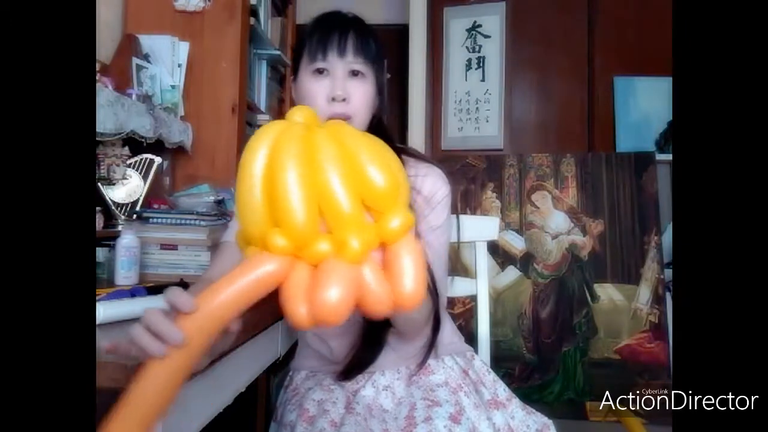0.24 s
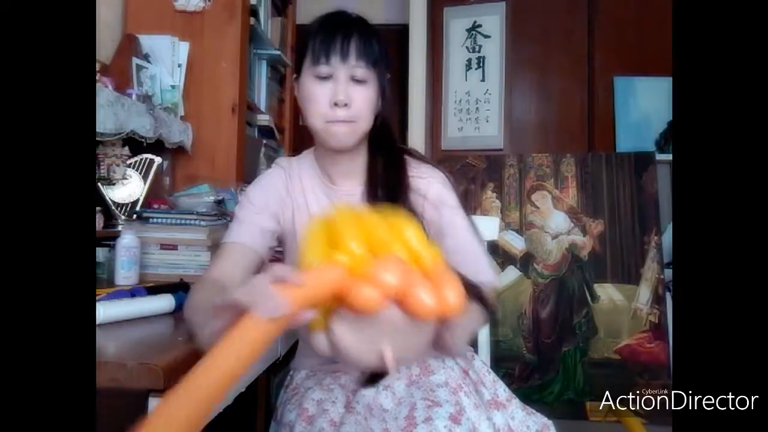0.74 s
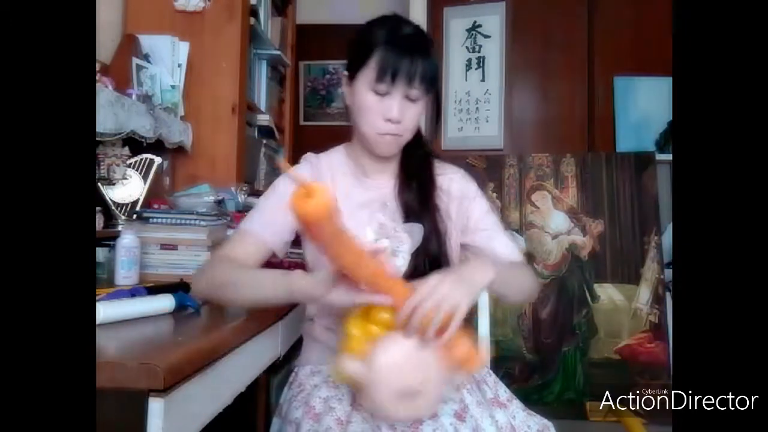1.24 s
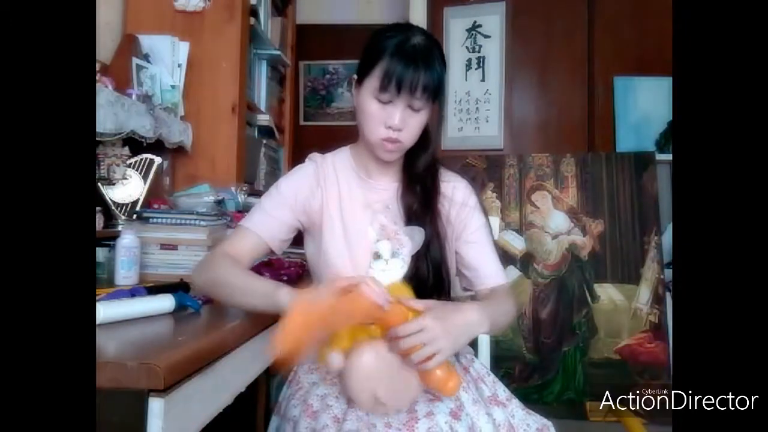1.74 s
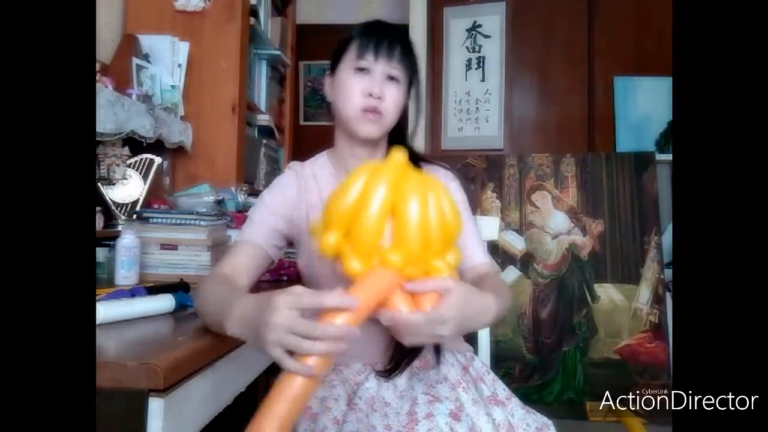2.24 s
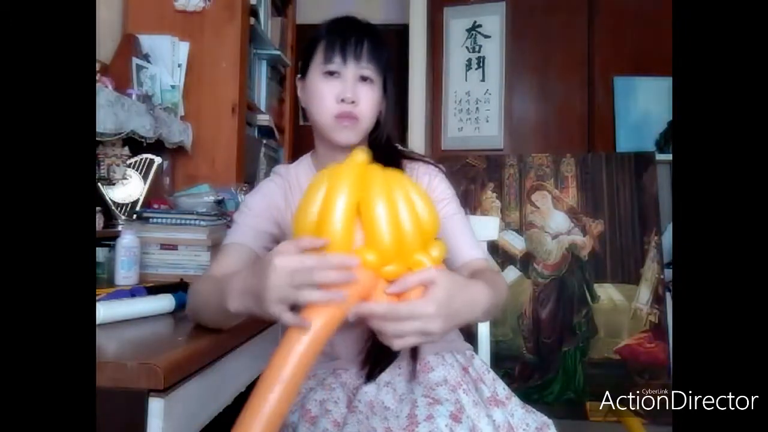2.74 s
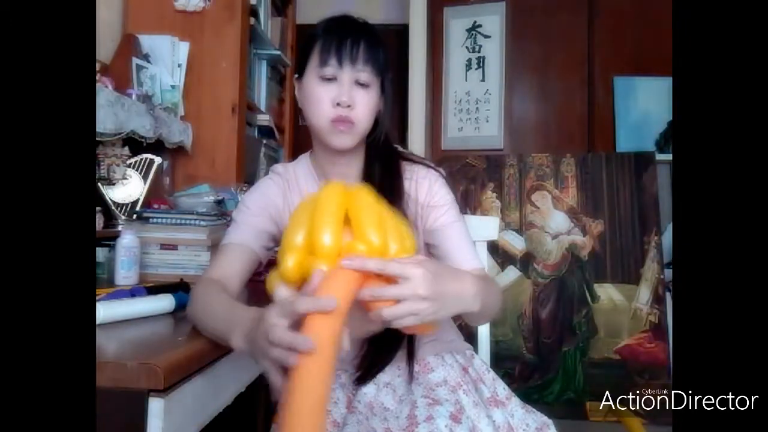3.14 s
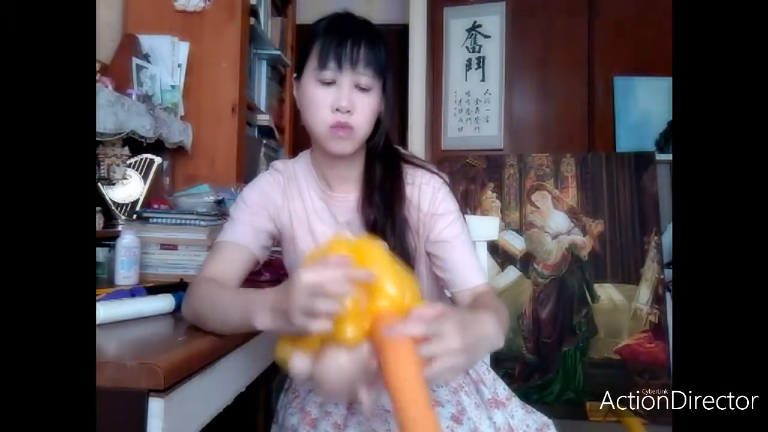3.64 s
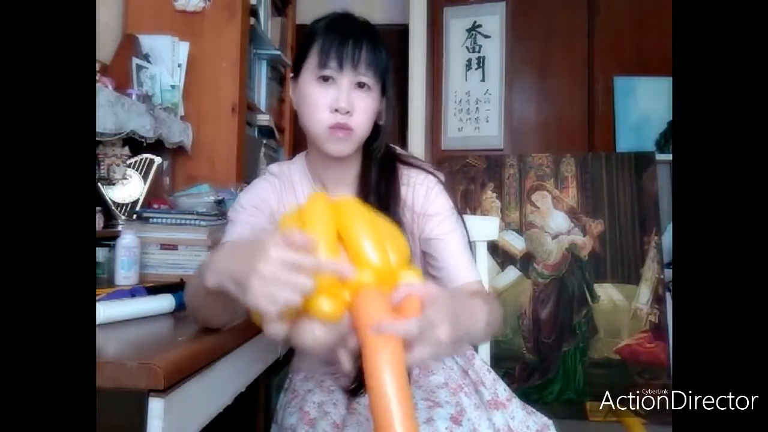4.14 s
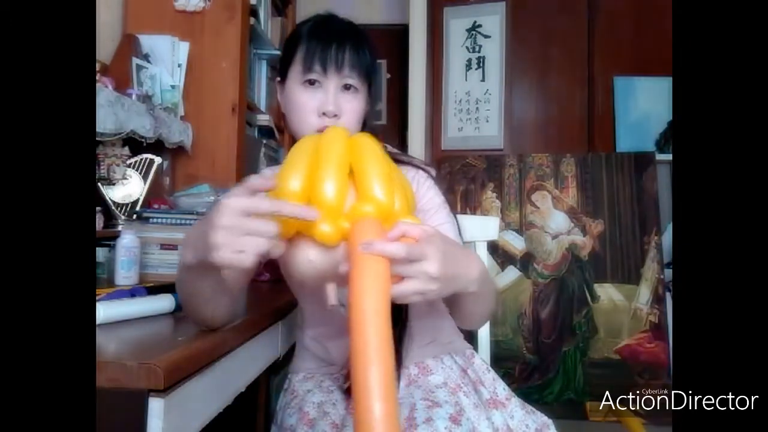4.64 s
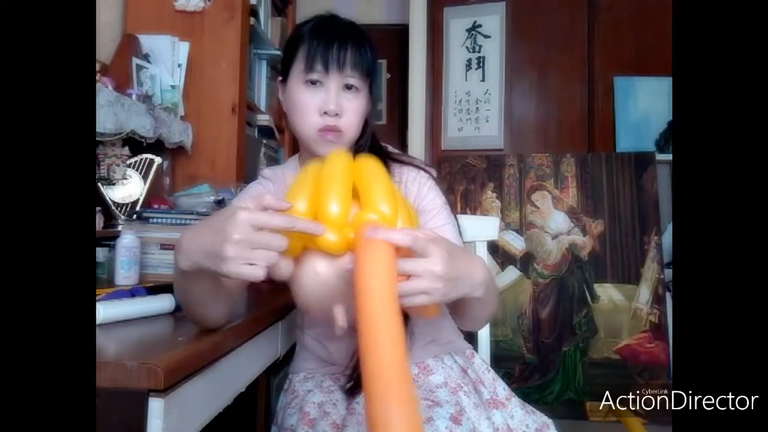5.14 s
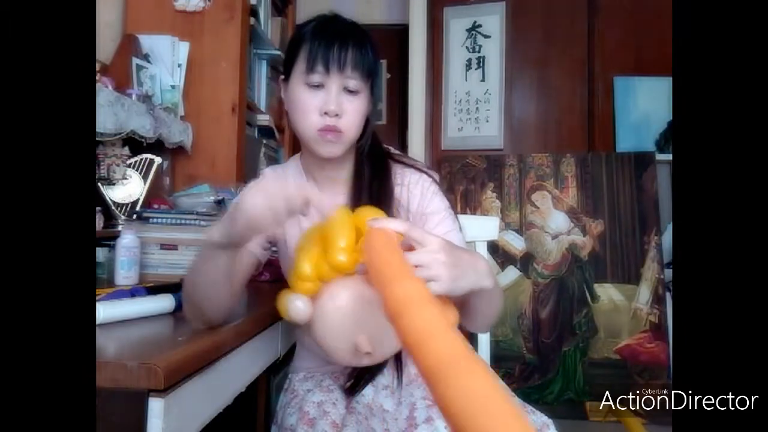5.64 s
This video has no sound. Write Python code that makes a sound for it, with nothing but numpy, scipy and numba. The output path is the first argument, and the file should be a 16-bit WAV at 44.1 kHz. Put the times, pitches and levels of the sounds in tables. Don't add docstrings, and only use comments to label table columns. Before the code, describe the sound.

Hands twist inflated balloons together at a desk. Faint rubbing and soft lap bumps come first, with isolated rubbery snaps, then short creaks and squeaks. Around four seconds loud snaps and a rapid stuttering creak burst out, followed by paired hollow clacks and a final sharp slap. A small room adds a short tail; a low fan hums. The tablet microphone, about an arm's length away, sounds thin and treble-peaked.

```python
import sys
import numpy as np
from scipy import signal
from scipy.fft import rfft, irfft
from scipy.io import wavfile
from scipy.ndimage import uniform_filter1d
from numba import njit

SR = 44100
rng = np.random.default_rng(int(sys.argv[2]) if len(sys.argv) > 2 else 0)


def int16_out(signal):
    q = np.round(np.clip(np.atleast_2d(signal).T, -1, 1) * 32767)
    wavfile.write(sys.argv[1], SR, q.astype(np.int16))


def boost(x):
    u = np.asarray(x, float) / 20
    return 10 ** u


N = 260190

# (time [s], peak [dB], tube ring [Hz], ring level [dB])
SNAPS = [(.6247, -39.5, 3920, -1), (.7741, -34, 1400, -14), (1.6631, -28, 650, -12),
         (2.251, -36, 1370, -18), (2.448, -44.5, 684, -16), (2.5226, -39, 810, -21),
         (2.635, -40.5, 2150, -12), (2.8905, -36.5, 1710, -22), (2.9678, -44.5, 550, -13),
         (3.9767, -24.5, 634, -20), (4.0063, -20, 6600, -7), (4.1245, -24, 2000, -13),
         (4.298, -26.5, 907, -6), (4.3008, -26, 1980, -8), (4.3364, -52, 860, -2.5),
         (4.5625, -30.5, 2560, -17)]
TICKS = [(.7944, -52, 3800, 1), (.8744, -54, 961, -12), (1.323, -55, 880, 4), (1.4014, -50, 720, -19.5),
         (1.4435, -40.5, 2560, 1), (1.7389, -40.5, 560, -8), (1.7964, -43.5, 800, -5),
         (1.8578, -43, 4020, -6), (1.8795, -41, 3810, -9), (1.886, -38, 3540, -4), (1.945, -48, 3460, -13),
         (2.1061, -51.5, 1980, 3), (2.1415, -47, 493, 1), (2.4176, -57, 861, -20), (2.4766, -49.5, 780, 0),
         (2.5571, -46, 1260, 4.5), (2.5646, -43.5, 1740, -1), (3.1117, -48, 657, -22),
         (3.2315, -45, 2800, 0.5), (4.1145, -26, 4600, 7), (4.1143, -28, 6600, 2), (4.1225, -38, 6800, 3),
         (4.55, -37.5, 668, 1.5), (4.9666, -58, 640, 9), (5.3224, -41, 5600, 12.5), (3.672, -62, 6500, -13),
         (5.4825, -61, 6500, -12), (2.822, -48, 11500, 25.5), (3.865, -64, 12000, 22),
         (3.8975, -66, 14000, 28), (4.0982, -64, 13000, 20), (4.306, -65, 14000, 25),
         (4.3135, -58, 13000, 24), (4.3392, -60, 10000, 26), (3.9768, -51, 11900, 25),
         (3.2, -74, 12000, 22), (2.2025, -60, 12000, 31)]
POPS = [(1.4519, -38.5, 5070, 5.5), (2.2019, -27, 1040, -12), (3.066, -41, 662, -25),
        (3.3553, -32.5, 1384, -0.5), (3.7327, -47.5, 2150, 7.5), (3.8452, -30.5, 2300, -10),
        (3.925, -37.5, 2500, -7), (4.0114, -24.5, 580, -2.5), (4.4777, -30.5, 2100, -28.5),
        (4.6259, -41.5, 1020, -13), (4.698, -31, 2700, -6.5), (4.754, -28, 1340, -8),
        (5.253, -36, 1450, -11), (5.868, -41.5, 920, -7), (3.593, -29.5, 732, -0.5),
        (3.8465, -35, 675, -2.5), (4.4175, -34.5, 1160, 1.5), (5.323, -40.5, 1030, 7.5),
        (1.666, -32.5, 656, -7)]
SLAPS = [
    (5.5479, -14, 3080, -11),
    (5.549, -18.5, 6340, 3.5),
    (5.5497, -27, 870, 3.5),
    (5.5555, -30, 1460, 0),
    (5.553, -32, 1150, -12),
    (5.5604, -25.5, 1460, 1),
    (5.5655, -31.5, 1400, 3),
    (5.5715, -36, 1350, 2),
    (5.575, -40, 6400, 1),
]
CLACKS = [(4.1393, -19, 1300, -10), (4.1833, -18.5, 1200, -10.5), (4.6873, -21.5, 1140, -3),
          (4.6944, -20.5, 1200, -10), (4.7412, -19.5, 1150, -7.5), (4.7509, -21, 1240, -9),
          (5.2295, -29.5, 1100, -4.5), (5.2353, -29, 1200, -11), (5.2417, -29, 1000, -6),
          (5.2445, -29, 1100, -14), (5.248, -23, 1246, -7.5), (5.2688, -33, 1150, -4),
          (5.2827, -32.5, 1000, -4), (5.292, -43, 800, -2), (5.301, -41, 800, 1), (.6252, -35, 1710, -9),
          (4.0068, -18, 2800, -20), (4.3128, -28, 1250, -6), (3.59, -29, 1400, -9)]

# (start [s], length [s], level [dB], tube ring [Hz], treble [dB])
CREAKS = [(.634, 0.0093, -49, 4000, -3), (.645, 0.052, -65, 4040, -4), (.755, 0.12, -68, 6800, 7.5),
          (.774, 0.011, -62, 3700, -4), (.925, 0.028, -68, 4500, 2), (1.025, .04, -81, 4500, 6),
          (1.664, 0.029, -47.5, 1500, -0.5), (1.675, 0.057, -46.5, 634, -11), (2.015, 0.032, -70, 4830, 9),
          (2.1, 0.077, -56, 2040, -9), (2.686, 0.027, -54.5, 6800, 8), (2.734, 0.027, -49, 3770, 1),
          (2.812, 0.011, -48, 1390, -10), (2.82, 0.018, -42.5, 1350, -8), (2.822, 0.061, -74, 11500, 11),
          (2.856, 0.025, -64, 6700, 3), (2.89, 0.029, -58, 4000, 2), (2.936, 0.019, -64, 6700, 3.5),
          (3.0, 0.021, -67.5, 6600, 7), (3.056, 0.017, -64, 5000, -1), (3.232, 0.017, -55.5, 6600, 7),
          (4.088, 0.06, -53.5, 6500, 0), (4.1122, 0.0048, -46, 6600, 0), (4.1142, 0.018, -35, 4400, -2),
          (4.184, 0.098, -55, 11000, 16), (4.12, 0.042, -60, 11000, 11), (4.648, 0.032, -54.5, 6700, 12.5),
          (3.458, 0.026, -35.5, 760, -27), (3.135, 0.0456, -53, 4280, -6), (3.065, 0.027, -53, 1720, -20),
          (3.3565, 0.057, -36, 2310, -12.5), (3.41, 0.0426, -41.5, 3170, -31.5),
          (3.448, 0.043, -38.5, 1570, -24), (3.574, 0.014, -48, 3930, -25), (3.61, 0.027, -41, 2320, -26),
          (3.841, 0.0077, -47.5, 2120, -7), (4.643, 0.017, -33, 1020, -18),
          (5.5315, 0.011, -42, 2000, -5.5), (5.5455, 0.004, -44, 6260, 7), (5.548, 0.011, -45, 1400, 7),
          (5.858, 0.047, -55, 1040, -33)]
# (start [s], length [s], level [dB], tube ring [Hz], treble [dB])
GROANS = [
    (1.7, 0.11, -58, 620, -28),
    (3.27, 0.088, -48.5, 1730, -26),
    (3.5, 0.028, -41, 1630, -29),
    (3.9412, 0.0078, -33.5, 1010, -11),
    (4.145, 0.047, -39, 1560, -13),
    (4.32, 0.034, -34, 873, -41),
    (5.25, 0.051, -52, 745, -27),
]
# (start [s], length [s], slip rate [1/s], level [dB], tube ring [Hz])
SQUEAKS = [
    (3.29, 0.021, 1100, -53, 2320),
    (3.1, 0.014, 950, -65, 2330),
    (3.379, 0.035, 480, -32.5, 1880),
    (3.5925, 0.014, 310, -35.5, 1530),
    (4.414, 0.0082, 506, -32.5, 1120),
    (4.444, 0.0234, 400, -36.5, 2600),
    (4.3, 0.021, 655, -33.5, 3300),
    (3.134, 0.0295, 1900, -60, 4320),
    (2.905, 0.019, 2300, -68, 3600),
    (3.734, 0.016, 990, -67, 2280),
]
# (start [s], length [s], slip rate [1/s], level [dB], tube ring [Hz], treble [dB])
JUDDER = [
    (4.1896, .077, 142.8, 0, 890, -2),
]
# (start [s], length [s], slip rate [1/s], level [dB], tube ring [Hz], treble [dB])
RASPS = [
    (4.185, .09, 370, -38, 580, -25),
    (4.2, .075, 490, -39.5, 420, -25),
    (4.196, 0.0587, 400, -33.5, 1600, -25),
    (1.668, 0.049, 480, -59, 870, -25),
    (1.72, 0.071, 400, -55.5, 680, -25),
    (4.008, 0.0213, 550, -37.5, 630, -18),
]
NEIGHBOURS = (.82, 1, 1.2)
# (frequency [Hz], width [Hz], level [dB])
BUNCH = [(414, 65, 3), (560, 395, 17.5)]
# (time [s], level [dB], drum pitch [Hz])
THUMPS = [(1.664, -53, 634), (1.7, -52.5, 589), (1.745, -50.5, 643), (2.821, -40.5, 366),
          (2.979, -52.5, 373), (3.362, -46.5, 335), (3.46, -41.5, 316), (3.593, -41, 388),
          (4.009, -41, 314), (4.226, -40, 416), (4.452, -44.5, 354), (4.658, -41, 660), (4.75, -40, 235),
          (5.249, -51.5, 390)]
# (middle [s], length [s], rub level [dB], hiss level [dB])
SLIDES = [(0., 0.16, -88, -75.5), (0.825, 0.12, -78.5, -75), (1.05, 0.047, -109, -75.5),
          (1.356, 0.177, -89, -74), (1.494, .12, -66, -55), (1.697, 0.067, -73, -67),
          (1.872, 0.18, -80, -58), (2.02, 0.21, -81, -69), (2.229, 0.083, -74, -63.5),
          (2.322, 0.066, -88, -66.5), (2.515, 0.31, -80.5, -75), (2.716, 0.12, -70.5, -71),
          (2.93, 0.18, -97, -75), (3.164, 0.17, -78, -62.5), (3.28, 0.034, -62, -64),
          (3.399, 0.12, -52, -78), (3.78, 0.2, -77.5, -88), (3.856, 0.076, -79, -62.5),
          (4.003, 0.046, -59, -47), (4.24, 0.17, -50.5, -54), (4.438, 0.085, -72, -56),
          (4.563, 0.021, -58, -76), (4.7, 0.28, -73.5, -81), (5.287, 0.073, -86, -88),
          (5.46, 0.18, -88.5, -81), (5.69, 0.088, -76, -75)]
# (middle [s], length [s], level [dB])
BUMPS = [(.25, 0.21, -60), (1.33, 0.21, -51), (.87, 0.076, -59), (1.0, 0.2, -57.5), (1.2, 0.085, -54),
         (1.51, 0.038, -55), (1.58, 0.017, -48.5), (1.71, 0.11, -58.5), (1.81, 0.045, -58),
         (1.89, 0.031, -60.5), (2.02, 0.18, -66), (2.21, 0.12, -62), (2.31, 0.052, -62),
         (2.53, 0.28, -57.5), (2.7, 0.14, -60), (2.83, 0.12, -52.5), (3.1, 0.27, -52.5), (3.27, 0.14, -64),
         (3.52, 0.27, -61.5), (3.85, 0.27, -60.5), (4.0, 0.075, -52.5), (4.12, 0.17, -53),
         (4.27, 0.18, -51), (4.45, 0.11, -54), (4.58, 0.092, -56), (4.8, 0.19, -54), (5.1, 0.37, -54.5),
         (5.29, 0.031, -54), (5.41, 0.044, -53.5), (5.7, 0.3, -58)]
# (frequency [Hz], level [dB])
FAN_AIR = [(18, -28), (33, -14), (47, -1.5), (64, -7), (90, -0.5), (121, -7), (245, -8.5), (364, -15),
           (473, -16), (554, -15), (600, -11.5), (988, -15), (1630, -30.5), (5740, -41), (14800, -36.5),
           (16000, -34)]
# (frequency [Hz], level [dB])
HUM = [(48.5, -67.5), (99, -68.5), (146, -72.5), (238, -73), (481, -74.5)]
# (frequency [Hz], gain [dB])
MIC = [(100, -18), (300, -2.5), (1500, 6), (4500, 2.5), (5500, 0.5), (6300, 2.5), (6850, 5), (7400, -4.5),
       (8000, -11.5), (9500, -18), (12500, -14), (16000, -9)]

TICK_TREBLE_DB, SNAP_TREBLE_DB, POP_TREBLE_DB = 2, -19, -63
SLAP_TREBLE_DB, CLACK_TREBLE_DB = -20, -11.5
BOOM_DB, SLAP_BOOM_DB, CLACK_BOOM_DB = -27, -63, -26.5
SLAP_FLUTTER, CLACK_FLUTTER = 0.09, 0.05
CREAK_PER_S, GROAN_PER_S = 800, 400
JUDDER_DB, JUDDER_SPEEDUP_PER_S, JUDDER_JITTER = -21.5, 4.1, 0.004
REST_RUB_DB, REST_HISS_DB, REST_BUMP_DB = -81, -117, -102


@njit
def bandpass(x, hz, width):
    y = np.empty(len(x))
    band, low = 0., 0.
    g, k = np.tan(np.pi * hz / SR), width / hz
    for i in range(len(x)):
        v = (band + g * (x[i] - low)) / (1 + g * (g + k))
        low += 2 * g * v
        band = 2 * v - band
        y[i] = k * v
    return y


def unit(x):
    return x / np.sqrt(np.mean(x ** 2))


def colour(x, points, size=4096):
    hz, db = np.transpose(points)
    bins_hz = np.arange(size // 2 + 1) * SR / size
    gain = boost(np.interp(np.log(bins_hz + 1), np.log(hz), db))
    cepstrum = irfft(np.log(gain))
    cepstrum[1:size // 2] *= 2
    cepstrum[size // 2 + 1:] = 0
    return signal.fftconvolve(x, irfft(np.exp(rfft(cepstrum))))[:len(x)]


def walk(rate):
    hold = int(SR / rate)
    goals = np.repeat(rng.standard_normal(N // hold + 1), hold)
    return unit(uniform_filter1d(goals, hold)[:N])


def add(out, s, part):
    i = int(s * SR)
    out[i:i + len(part)] += part[:len(out) - i]


def latex(kicks, hz, ring_db, treble_db, bunch_db):
    crack = 2.265 * bandpass(kicks, 2200.0, 7700.0)
    spit = bandpass(kicks, 7060.0, 4500.0) + 0.47 * bandpass(kicks, 10900.0, 6900.0)
    spit = 1.97 * boost(treble_db + 9.5) * spit
    width = 70 + 0.2 * hz
    overtone = bandpass(kicks, min(2.306 * hz, 15000.), 0.17 * width)
    ring = bandpass(kicks, 1. * hz, width) - 0.85 * overtone
    ring = boost(ring_db - 24.0) * SR / np.sqrt(300 * width) * ring
    boom = sum(boost(db) * SR / w * bandpass(kicks, 1. * f, 1. * w) for f, w, db in BUNCH)
    boom = boost(bunch_db - 18.5) * bandpass(boom, 564.0, 1100.0)
    return crack + spit + ring + boom


def releases(rows, treble_1k_db, boom_db=BOOM_DB, flutter=0.14, push=-0.7):
    out, t = np.zeros(N), np.arange(3000) / SR
    for s, db, hz, ring_db in rows:
        kicks = flutter * rng.standard_normal(len(t)) * np.exp(-t / 0.004)
        kicks[0] = push
        treble_db = treble_1k_db + np.log2(hz / 1000)
        bunch_db = boom_db - 0.0379 * (db + 55)
        add(out, s, boost(db - 2.0) * latex(kicks, hz, ring_db, treble_db, bunch_db))
    return out


def trains(rows, jitter, scatter_db, fuzz, ring_db, bunch_db, speedup=2, tubes=(1,)):
    out, size = np.zeros(N), SR // 7
    grip_shift_s = 0.0061
    for s, length, rate, db, hz, treble_db in rows:
        timing, strength = rng.standard_normal((2, 80))
        hurry = 1 - speedup * (np.arange(80) / rate - length / 2)
        steps = (1 + jitter * timing) * hurry / rate
        along = np.arange(size) / (SR * length)
        grip = (0.76 + 0.39 * along) * np.clip(4 * (1 - along), 0, 1)
        place = np.clip(np.cumsum(np.abs(steps)) - steps[0], 0, length) * SR
        kicks = fuzz * np.sqrt(rate / SR) * rng.standard_normal(size)
        i = place.astype(int)
        slip = -boost(scatter_db * strength)
        np.add.at(kicks, i, slip * (1 - place + i))
        np.add.at(kicks, i + 1, slip * (place - i))
        turns = (np.arange(size) / (SR * grip_shift_s)).astype(int)
        tube = rng.integers(0, len(tubes), 100)[turns]
        for k, ratio in enumerate(tubes):
            held = grip * (tube == k)
            if np.any(held):
                ring_hz = min(hz * ratio, 14000.)
                add(out, s, boost(db) * latex(kicks * held, ring_hz, ring_db, treble_db, bunch_db))
    return out


def contact(x, knock):
    hollow = knock * bandpass(x, 2930, 1060.0)
    return bandpass(x, 1300., 3000.0) + hollow + 0.43 * bandpass(x, 8700.0, 7000.)


def single_releases():
    out = releases(TICKS, TICK_TREBLE_DB) + releases(SNAPS, SNAP_TREBLE_DB) + releases(POPS, POP_TREBLE_DB)
    out = out + releases(SLAPS, SLAP_TREBLE_DB, SLAP_BOOM_DB, SLAP_FLUTTER)
    clacks = releases(CLACKS, CLACK_TREBLE_DB, CLACK_BOOM_DB, CLACK_FLUTTER, 0.67)
    return out + contact(clacks, 0.9)


def squeaks():
    rows = []
    for row in SQUEAKS:
        treble_db = -11.5 + 2 * np.log2(row[2] / 440)
        rows.append((*row, min(treble_db, 0)))
    return trains(rows, 0.015, 1.5, 0.22, -6, -29)


def judder():
    slips = trains(JUDDER, JUDDER_JITTER, 1.4, 0.44, -6.5, -23, JUDDER_SPEEDUP_PER_S)
    rasp = trains(RASPS, 0.3, 4.0, 2.9, -8.5, -31.5, tubes=NEIGHBOURS)
    return bandpass(rasp, 730.0, 1600.0) - boost(JUDDER_DB) * contact(slips, 0.2)


def creaks():
    rows = [(s, n, CREAK_PER_S, *rest) for s, n, *rest in CREAKS]
    rows += [(s, n, GROAN_PER_S, *rest) for s, n, *rest in GROANS]
    return trains(rows, 0.25, 3.0, 0.8, -9.5, -27, tubes=NEIGHBOURS)


def thumps():
    out, t = np.zeros(N), np.arange(4000) / SR
    rise_s, fall_s = 0.0027, 0.015
    swell = (1 - np.exp(-t / rise_s)) * np.exp(-t / fall_s)
    for s, db, hz in THUMPS:
        add(out, s, boost(db) * swell * np.sin(2 * np.pi * hz * t * (1 - 1.44 * t)))
    return out


def swells(rows, rest_db):
    t = np.arange(0, N, 64) / SR
    gain = boost(rest_db)
    for s, length, db in rows:
        gain = gain + boost(db - 6 * (2 * (t - s) / length) ** 2)
    return np.interp(np.arange(N) / SR, t, 20 * np.log10(gain))


def grains():
    level_db = 1.8 * rng.exponential(size=N) + 3.2 * walk(30)
    return rng.standard_normal(N) * boost(level_db)


def hands():
    rub_db = swells([(s, n, db) for s, n, db, _ in SLIDES], REST_RUB_DB)
    hiss_db = swells([(s, n, db) for s, n, _, db in SLIDES], REST_HISS_DB)
    bump_db = swells(BUMPS, REST_BUMP_DB)
    top_db = -61
    rub = boost(np.minimum(rub_db, top_db)) * unit(bandpass(grains(), 1900.0, 4600.0))
    hiss = boost(np.minimum(hiss_db, top_db)) * unit(bandpass(grains(), 8160.0, 4800.0))
    thud = bandpass(rng.standard_normal(N), 230.6, 72.0)
    thud = bandpass(bandpass(thud, 136.0, 123.0), 149.0, 130.0)
    return rub + hiss + boost(bump_db + 2.0 * walk(18)) * unit(thud)


def room(x):
    t60_s, tail_db = 0.17, -5.5
    t, out = np.arange(int(0.35 * SR)) / SR, x
    turn = 1.5 * walk(25)
    for share in (np.cos(turn), np.sin(turn)):
        tail = rng.standard_normal(len(t)) * boost(-60 * t / t60_s) * (1 - np.exp(-t / 0.00077))
        tail = colour(tail, [(200, -4), (1000, 0), (5840, 0), (12000, -6)])
        tail = tail / np.sqrt(np.sum(tail ** 2))
        out = out + boost(tail_db) * signal.fftconvolve(x * share, tail)[:N]
    return out


def fan():
    air = unit(colour(rng.standard_normal(N), FAN_AIR)) * boost(-62 + 1.0 * walk(6.5))
    air = air + bandpass(air, 520., 800.) * (boost(1.5 * walk(24)) - 1)
    t = np.arange(N) / SR
    lines = np.zeros(N)
    for hz, db in HUM:
        level = boost(db + min(hz / 40, 4) * walk(9))
        lines += level * np.sin(2 * np.pi * hz * t + min(hz / 60, 2.5) * walk(8))
    start_db, settle_s = -2, 1
    return (air + lines) * boost(start_db * np.exp(-t / settle_s))


def scene():
    balloons = single_releases() + squeaks() + judder() + creaks() + thumps() + hands()
    return (colour(room(balloons), MIC) + fan())[None]


def top_cut(x):
    return signal.sosfilt(signal.butter(12, 16660, fs=SR, output="sos"), x)


def record(dry):
    dry = signal.sosfilt(signal.butter(6, 40, "high", fs=SR, output="sos"), dry)
    body = signal.sosfiltfilt(signal.ellip(10, 0.1, 40, 15500, fs=SR, output="sos"), dry)
    leak = boost(-38) * (dry - body)
    return top_cut(body + leak)


dry = scene()
out = record(dry)
int16_out(out)
```